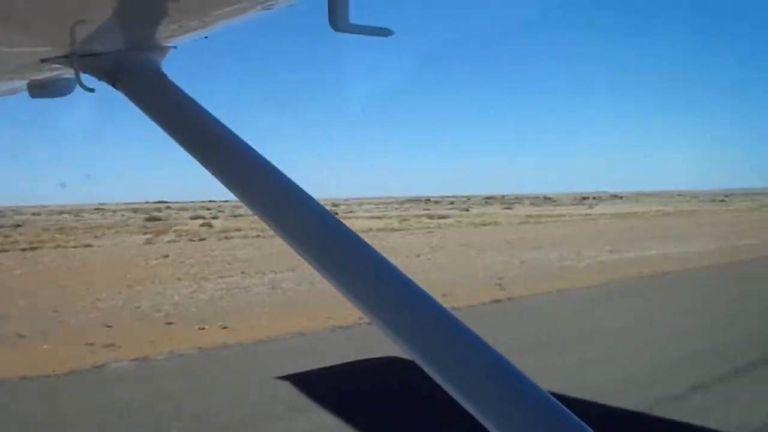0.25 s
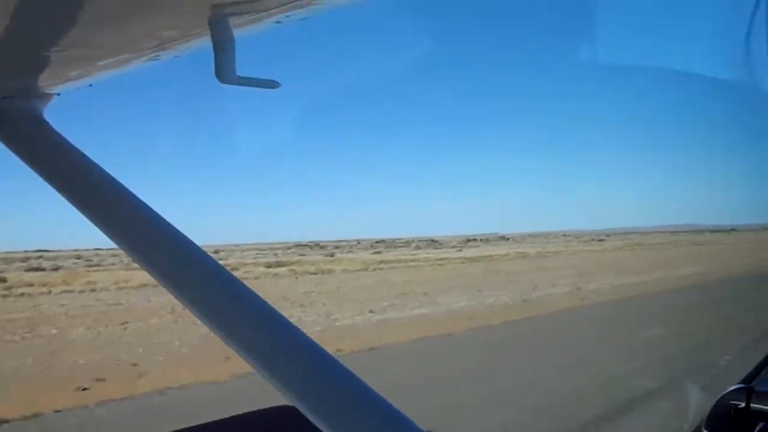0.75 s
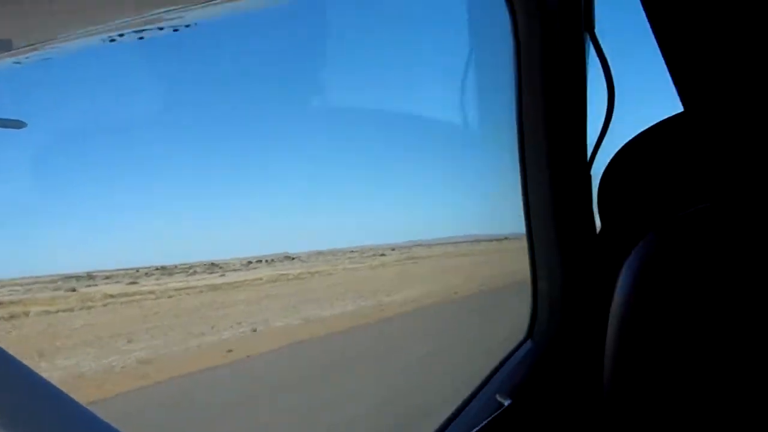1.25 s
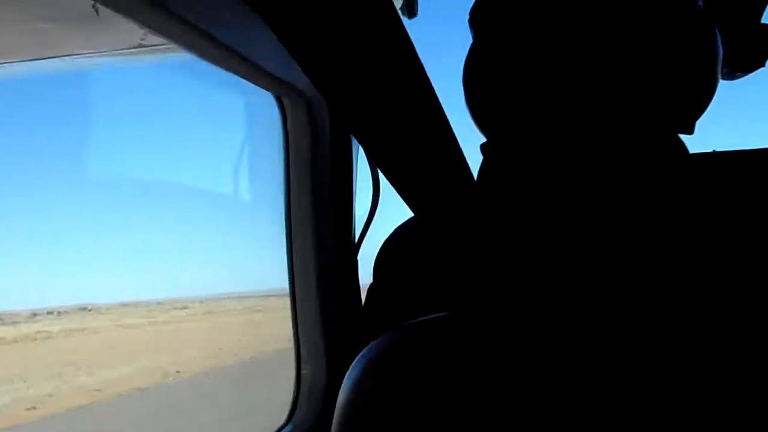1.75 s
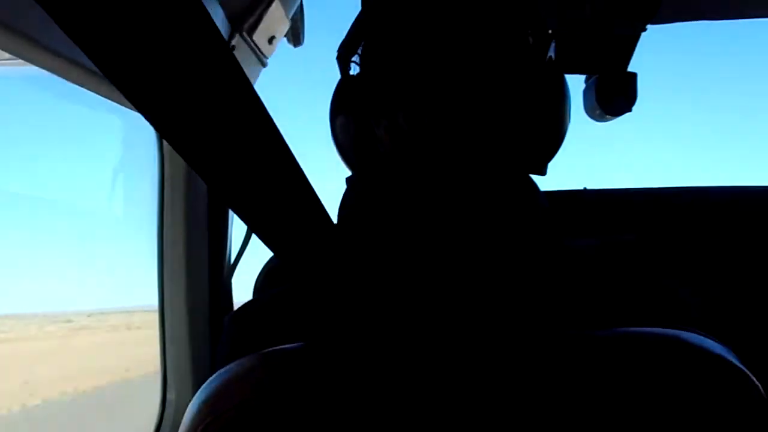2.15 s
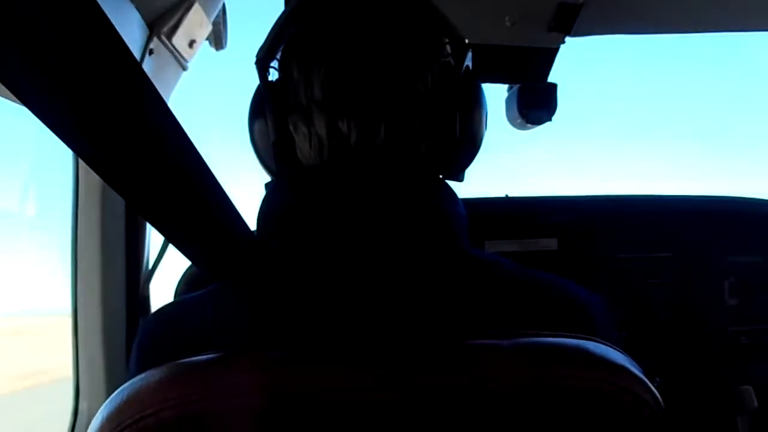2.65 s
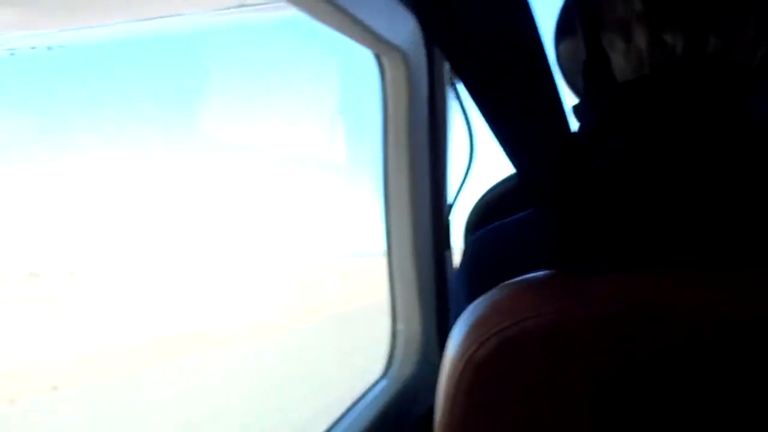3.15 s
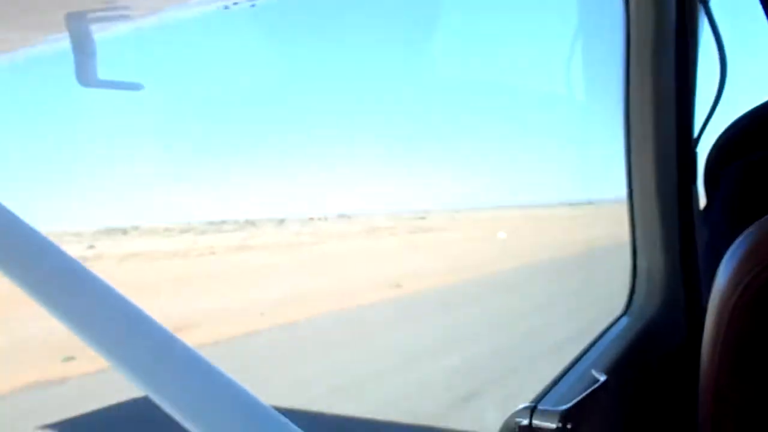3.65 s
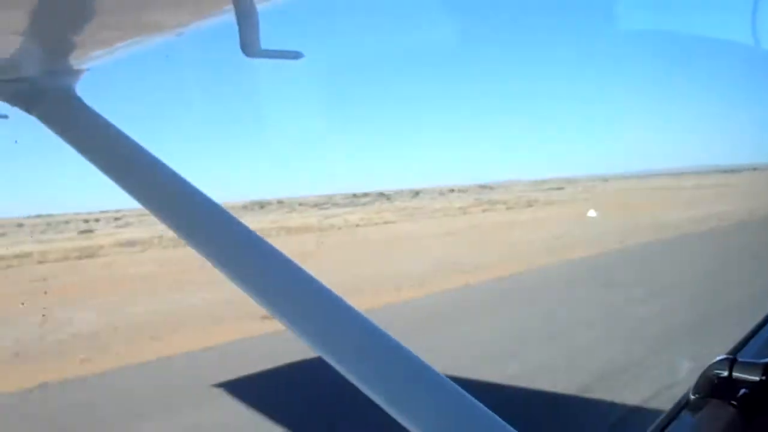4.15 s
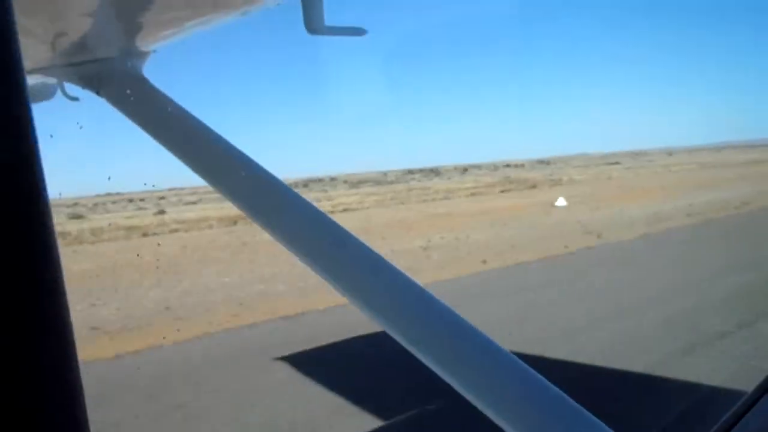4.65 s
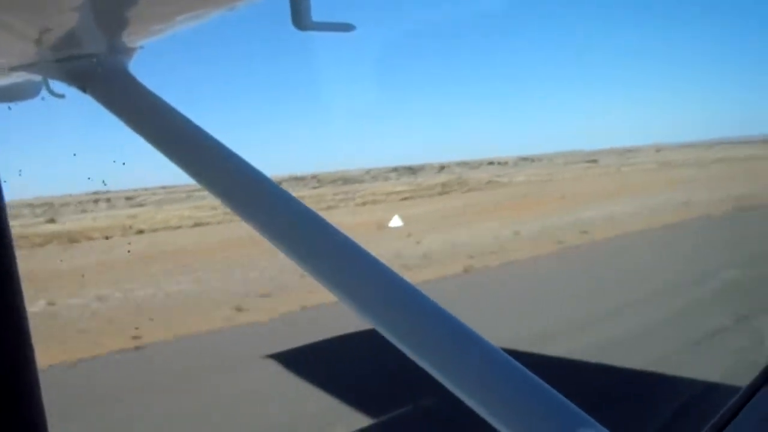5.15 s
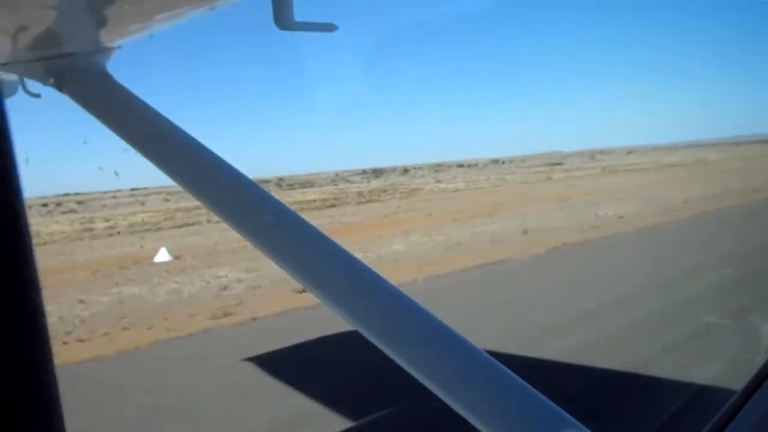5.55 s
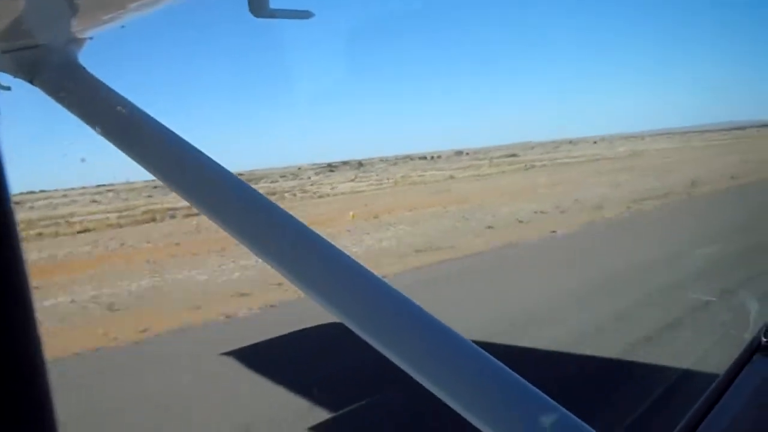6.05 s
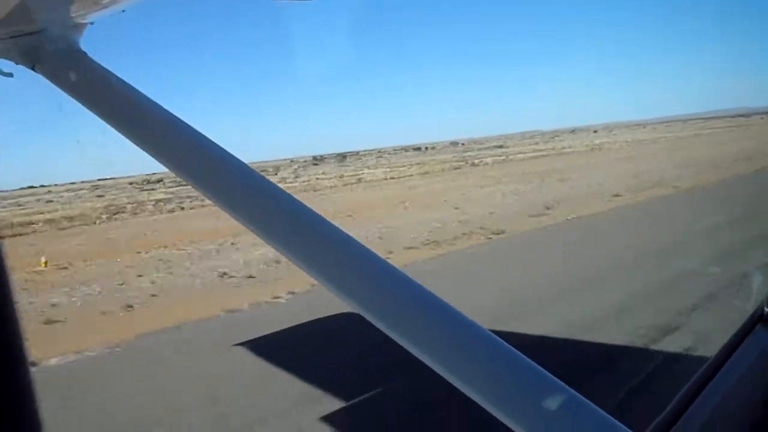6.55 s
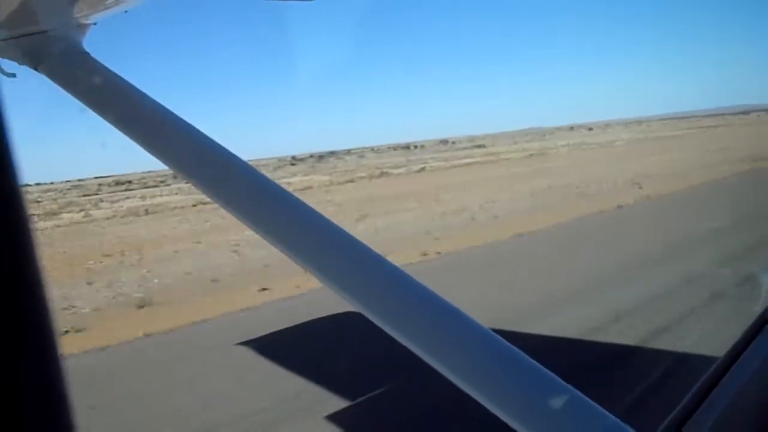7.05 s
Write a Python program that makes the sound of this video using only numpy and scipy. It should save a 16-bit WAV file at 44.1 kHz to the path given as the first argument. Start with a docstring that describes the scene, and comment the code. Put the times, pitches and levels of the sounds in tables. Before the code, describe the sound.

Loud low engine and propeller boom in a light aircraft cabin, rising slightly in pitch, with airy hiss, fluttering whistle and a few dry handling clicks.

```python
"""A light aircraft on its take-off run at full power, heard from a rear seat.
From the start, engine and propeller tones climb and boom over filtered-noise airflow and a gap whistle.
Early on, high crests overload the recorder, which buzzes briefly on each.
The microphone turns from the side window to the front, then most of the way back amid dry clicks.
The boom fades as slipstream and tyre rumble grow."""
import sys
import numpy as np
from scipy import signal
from scipy.fft import rfft, irfft
from scipy.io import wavfile
from scipy.ndimage import uniform_filter1d

SR = 44100
rng = np.random.default_rng(int(sys.argv[2]) if len(sys.argv) > 2 else 0)


def transcribe(signal):
    """Save signal, clipped to [-1, 1], as a 16-bit WAV file at the path in sys.argv[1]."""
    frames = np.atleast_2d(signal).T
    limited = np.clip(frames, -1, 1)
    pcm = np.round(limited * 32767).astype(np.int16)
    wavfile.write(sys.argv[1], SR, pcm)


N = 322812
TIME_S = np.arange(N) / SR

# engine speed: (time [s], four-stroke cycle rate [Hz])
CYCLE_RATE = [(0, 18.4), (0.4, 18.72), (0.8, 19.14), (1.2, 19.45), (2, 19.92), (3.6, 21.06), (4.8, 21.62),
              (5.6, 21.83), (6, 21.85), (6.4, 21.98), (6.8, 22.32), (7.32, 22.6)]
LOW_SPEED_HZ, HIGH_SPEED_HZ = 18.4, 22.6
MIDDLE_SPEED = 0.7  # share of the way from low to high speed
# boom at six firings a cycle, between surges: (time [s], level [dB])
BOOM_LEVEL = [(0.1, -14.5), (0.4, -12), (0.8, -11.5), (2.8, -14), (4.4, -15.7), (4.8, -18.5), (6.25, -19.9),
              (6.85, -25.5), (7.32, -19.5)]
# single-swing surges of the boom: (time [s])
SURGE_TIMES = [.320, .333, .387, .423, .476, .528, .582, .652, .739, .792, .810, .863, .931, .966, 1.065,
               1.104, 1.190, 1.207, 1.236, 1.322, 1.361, 1.429, 1.492, 1.564, 1.717, 1.781]
SURGE_DB, SURGE_S = -9, 0.0026
# prominent engine lines: (multiple of cycle rate, level at low, middle, high speed [dB])
OVERTONES = [(3, -46, -39, -37), (4, -43, -35, -36), (7, -53.5, -42.5, -37), (9, -25.5, -31, -33),
             (12, -39.5, -37, -35), (18, -54.5, -37, -30), (20, -45.5, -41.5, -42), (23, -46, -46, -45),
             (28, -53.5, -46.5, -42), (30, -45, -47.5, -50)]
# cabin response to the weaker engine lines: (frequency [Hz], relative level [dB])
CABIN_RESPONSE = [(36, -43), (85, -44), (105, -48.5), (200, -43), (280, -59.5), (340, -49.5), (430, -45.5),
                  (490, -50.5), (570, -50.5), (640, -56), (740, -56.5), (830, -61.5), (1100, -58.5),
                  (1800, -63.5)]
# weaker lines: growth from low to high speed, slow swelling of each, change when facing forward
LINES_RISE_DB, LINES_SPREAD_DB, LINES_FORWARD_DB = 6.5, 3.5, -3
# microphone direction: (time [s], 0 = side window to 1 = forward)
FACING = [(0.8, 0), (2.05, 1), (2.7, 1), (3.3, 0.33), (4.2, 0.18)]
# valve ticking: (time [s], level [dB])
TICK_LEVEL = [(1.3, -55.5), (1.9, -50), (3.0, -48.5), (3.4, -53.5), (4.9, -53.5), (5.7, -55), (7.3, -54)]
# valve closings: (place in cycle [0-1], relative level [dB])
VALVE_CLOSINGS = [(0.0, 6.5), (.32, 0.5), (0.661, 2.5)]
# layers rising steadily: (level at start [dB], rise [dB/s], change when facing forward [dB])
TYRE_LEVEL = (-32.5, .52, 0)
SLIPSTREAM_LEVEL = (-39.5, 0.81, -0.72)
SEAL_LEVEL = (-38, 0.67, -1.9)
AIR_LEVEL = (-61.5, 0.54, -4.5)
# propeller wash buffeting the cabin: (time [s], level [dB])
BUFFET_LEVEL = [(0, -34.5), (2.5, -37.5), (4.5, -30), (6, -31.5), (7.32, -29)]
# cabin panels drumming under the wash: (time [s], level [dB])
PANEL_LEVEL = [(0, -40), (.7, -35.5), (1.3, -41.5), (2.1, -50), (2.9, -46), (3.5, -42.5), (4.3, -35),
               (7.32, -32.5)]
# air whistling through a narrow gap: (time [s], level [dB])
WHISTLE_LEVEL = [(0, -43.5), (1.2, -41.5), (2.2, -45), (3.4, -37), (4.2, -39.5), (6, -42), (7.32, -38.5)]
# dry clicks: (time [s], peak level [dB])
CLICKS = [(1.9322, -21.5), (2.0205, -25), (2.3529, -24), (3.1755, -22), (3.2446, -19), (3.3241, -22),
          (3.3774, -18), (3.4128, -20), (3.4167, -21), (3.5591, -24), (3.6071, -25), (3.6785, -21)]

# spectrum of the valve ticking: (frequency [Hz], relative level [dB])
VALVE_SPECTRUM = [(1500, -37), (2600, -6.5), (3600, 3), (4000, -6), (4400, -9.5), (4620, -6), (4780, 0.5),
                  (4930, -9.5), (5250, -17), (7000, -32.5), (14000, -24)]
# spectrum of the tyre rumble: (frequency [Hz], relative level [dB])
TYRE_SPECTRUM = [(10, -12.5), (22, -3), (31, 1), (44, 0.5), (80, 2.5), (120, 3), (200, -6.5), (350, -33),
                 (900, -66)]
# spectrum of the buffeting: (frequency [Hz], relative level [dB])
BUFFET_SPECTRUM = [(60, -36.5), (110, -9), (140, -1), (175, 1.5), (230, -4.5), (290, -11), (420, -31.5),
                   (1000, -68.5)]
# spectrum of the drumming panels: (frequency [Hz], relative level [dB])
PANEL_SPECTRUM = [(200, -24.5), (320, 0.5), (400, 2.5), (490, -1.5), (580, 2.5), (660, -7.5), (830, -7.5),
                  (1100, -30), (2000, -53.5)]
# spectrum of the slipstream: (frequency [Hz], relative level [dB])
SLIPSTREAM_SPECTRUM = [(120, -19), (260, 4), (450, 0), (660, -4.5), (820, -4), (950, -7.5), (1090, -5.5),
                       (1250, -9), (1420, -6), (1800, -7), (2100, -11), (3500, -20), (7000, -56.5)]
# spectrum of the door-seal hiss: (frequency [Hz], relative level [dB])
SEAL_SPECTRUM = [(900, -51), (2050, -17.5), (2330, -4.5), (2600, -1), (2780, -1.5), (3080, -1.5),
                 (3400, -4), (3520, -10), (3680, -6), (3850, -15), (4400, -22), (4850, -24.5),
                 (5400, -28.5), (8000, -53.5)]
# spectrum of the fine air hiss: (frequency [Hz], relative level [dB])
AIR_SPECTRUM = [(2000, -12.5), (5000, -1), (6200, 2.5), (8000, 0.5), (10000, -0.5), (12500, -5),
                (14200, -3.5)]
# spectrum of the overload buzz, before saturation: (frequency [Hz], relative level [dB])
BUZZ_SPECTRUM = [(2500, -29), (4500, -7), (5800, -4.5), (7200, 3), (8400, -7.5), (9500, -18), (12500, -12),
                 (14200, -13.5)]
# spectrum of a dry click: (frequency [Hz], relative level [dB])
CLICK_SPECTRUM = [(1500, -27), (3500, 6.5), (5500, 7), (8000, -1.5), (11000, -3.5), (14000, -2)]

OVERLOAD_DB, OVERLOAD_HOLD_S, BUZZ_DB = -6.5, 0.0005, -30.5
BUZZ_DRIVE = 2  # saturation keeps the buzz strength nearly constant
EDGE_HZ = 14450


def amp(db):
    """Decibels to gain."""
    return 10 ** (np.asarray(db) / 20)


def unit(x):
    """Scales to rms 1."""
    return x / np.sqrt(np.mean(x ** 2) + 1e-20)


def curve(rows):
    """A time table, at every sample."""
    return np.interp(TIME_S, *np.transpose(rows))


def level_db(start_db, rise_db_per_s, forward_db):
    """Steady rise in dB, shifted by the way the microphone points."""
    return start_db + rise_db_per_s * TIME_S + forward_db * curve(FACING)


def colour(x, spectrum):
    """Filters x by a spectrum drawn on a log-frequency axis."""
    hz, db = np.transpose(spectrum)
    bins_hz = np.fft.rfftfreq(len(x), 1 / SR)
    gain = amp(np.interp(np.log(bins_hz + 1), np.log(hz), db))
    return irfft(rfft(x) * gain, len(x))


def noise(spectrum):
    """Coloured noise of rms 1."""
    return unit(colour(rng.standard_normal(N), spectrum))


def wander(rate_hz):
    """Slow random curve of rms about 1, rolling off above the given rate."""
    size = 4096
    bins_hz = np.fft.rfftfreq(size, TIME_S[-1] / size)
    rolloff = np.sqrt(1 + (bins_hz / rate_hz) ** 4)
    slow = irfft(rfft(rng.standard_normal(size)) / rolloff)
    return np.interp(TIME_S, np.linspace(0, TIME_S[-1], size), unit(slow))


def boom(cycles, fast):
    """Firings and blade passes drive the cabin air: one strong tone and its prominent companions."""
    boom_db = curve(BOOM_LEVEL) + 0.18 * wander(rate_hz=12)
    from_surge_s = np.min([abs(TIME_S - s) for s in SURGE_TIMES], axis=0)
    surge = np.exp(-(from_surge_s / SURGE_S) ** 4)
    boom_db = boom_db + (SURGE_DB - boom_db) * surge
    out = amp(boom_db) * np.sin(2 * np.pi * 6 * cycles)
    for order, *speed_dbs in OVERTONES:
        # the ninth line keeps step with the boom; the others start anywhere
        offset = rng.random() * (round(order) != 9)
        phase = 2 * np.pi * (round(order) * cycles + offset) + 0.2 * wander(rate_hz=3.8)
        line_db = np.interp(fast, [0, MIDDLE_SPEED, 1], speed_dbs) + 1.7 * wander(rate_hz=1.1)
        out += amp(line_db) * np.sin(phase)
    return np.sqrt(2) * out


def exhaust(cycles, cycle_hz, fast):
    """Unequal cylinders put weak lines at cycle-rate multiples, sliding through cabin resonances."""
    out = np.zeros(N)
    strong_orders = [6, *np.round(OVERTONES)[:, 0]]
    for order in np.setdiff1d(np.arange(2, 85), strong_orders):
        cabin_db = np.interp(order * cycle_hz, *np.transpose(CABIN_RESPONSE))
        line_db = cabin_db + LINES_SPREAD_DB * wander(rate_hz=0.6)
        phase = 2 * np.pi * (order * cycles + rng.random()) + 0.22 * wander(rate_hz=4)
        out += amp(line_db) * np.sin(phase)
    shift_db = LINES_RISE_DB * (fast - 0.5) + LINES_FORWARD_DB * curve(FACING)
    return amp(shift_db) * np.sqrt(2) * out


def valves(cycles):
    """Valves land at set places in each cycle; noise bursts stand for the metal they excite."""
    bursts = np.zeros(N)
    for place, db in VALVE_CLOSINGS:
        from_closing = (cycles - place + 0.5) % 1 - 0.5
        bursts += amp(db) * np.exp(-(from_closing / 0.043) ** 2)
    strength = amp(curve(TICK_LEVEL) + 3.4 * wander(rate_hz=14))
    return strength * unit(colour(bursts * rng.standard_normal(N), VALVE_SPECTRUM))


def tyres():
    """Tyres rolling on the ground: low rumble, growing steadily."""
    return amp(level_db(*TYRE_LEVEL)) * noise(TYRE_SPECTRUM)


def propeller_wash(gust):
    """Wash eddies buffet the cabin and drum its panels."""
    buffet = amp(curve(BUFFET_LEVEL) + 1.3 * gust) * noise(BUFFET_SPECTRUM)
    panels = amp(curve(PANEL_LEVEL) + 0.5 * gust) * noise(PANEL_SPECTRUM)
    return buffet + panels


def slipstream(cycles, gust):
    """Slipstream, seal and fine air hiss, throbbing once and three times an engine cycle."""
    throb = 1 + 0.095 * np.cos(2 * np.pi * cycles) + 0.11 * np.cos(2 * np.pi * 3 * cycles)
    slip_db = level_db(*SLIPSTREAM_LEVEL) + 0.69 * gust
    seal_db = level_db(*SEAL_LEVEL) + 0.79 * gust + 0.5 * wander(rate_hz=16)
    air_db = level_db(*AIR_LEVEL) + 0.43 * gust + 1.7 * wander(rate_hz=12)
    slip = amp(slip_db) * noise(SLIPSTREAM_SPECTRUM)
    seals = amp(seal_db) * noise(SEAL_SPECTRUM)
    air = amp(air_db) * noise(AIR_SPECTRUM)
    return throb * (slip + seals + air)


def whistle(centre_hz, width_hz):
    """Turbulence in a narrow gap excites one fuzzy, fluttering resonance."""
    pitch_hz = centre_hz + 35 * wander(rate_hz=7)
    carrier = np.exp(2j * np.pi * np.cumsum(pitch_hz) / SR)
    lowpass = signal.butter(2, width_hz / 2, fs=SR, output="sos")
    swirl = signal.sosfilt(lowpass, rng.standard_normal(N) + 1j * rng.standard_normal(N))
    strength = amp(curve(WHISTLE_LEVEL) + 1.5 * wander(rate_hz=12))
    return strength * unit((carrier * swirl).real)


def overload(x):
    """Crests of either sign above the limit gate a saturated noise buzz."""
    hold_samples = max(round(OVERLOAD_HOLD_S * SR), 1)
    over = uniform_filter1d(1.0 * (abs(x) > amp(OVERLOAD_DB)), hold_samples)
    gate = np.minimum(2 * over, 1)
    buzz = unit(np.tanh(BUZZ_DRIVE * noise(BUZZ_SPECTRUM)))
    return x + amp(BUZZ_DB) * gate * buzz


def clicks():
    """Dry clicks: filtered impulses, most as the microphone swings back to the window."""
    out, size = np.zeros(N), 512
    click = colour(signal.unit_impulse(size, "mid"), CLICK_SPECTRUM)
    click = click / abs(click).max()
    for time_s, peak_db in CLICKS:
        start = round(time_s * SR) - size // 2
        out[start:start + size] += amp(peak_db) * click
    return out


def scene():
    """One crankshaft drives every engine sound and the slipstream throb; shared gusts stir the air."""
    cycle_hz = curve(CYCLE_RATE)
    fast = (cycle_hz - LOW_SPEED_HZ) / (HIGH_SPEED_HZ - LOW_SPEED_HZ)
    cycles = np.cumsum(cycle_hz * (1 + 0.0004 * wander(rate_hz=6))) / SR
    gust = wander(rate_hz=24)
    engine = boom(cycles, fast) + exhaust(cycles, cycle_hz, fast) + valves(cycles)
    airflow = propeller_wash(gust) + slipstream(cycles, gust) + whistle(centre_hz=3088, width_hz=168)
    return (engine + tyres() + airflow + clicks())[None]


def record(dry):
    """The recorder's overload, then its band limit."""
    lowpass = signal.firwin(511, EDGE_HZ, window=("kaiser", 9), fs=SR)
    return signal.oaconvolve(overload(dry), lowpass[None], "same")


dry = scene()
out = record(dry)
transcribe(out)
```